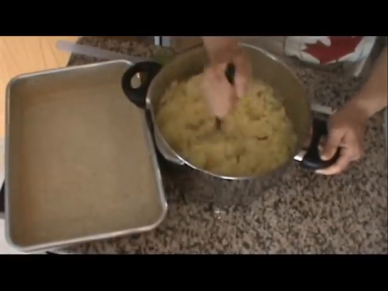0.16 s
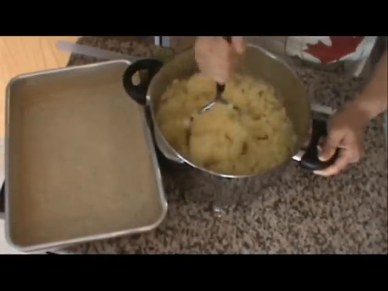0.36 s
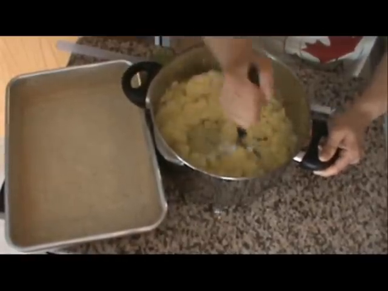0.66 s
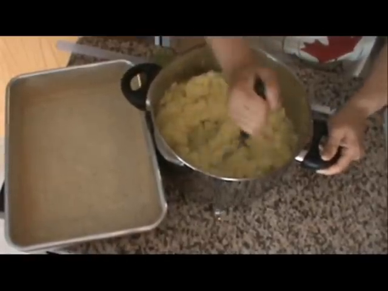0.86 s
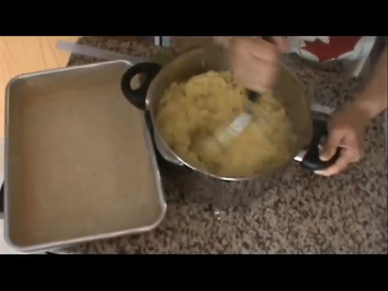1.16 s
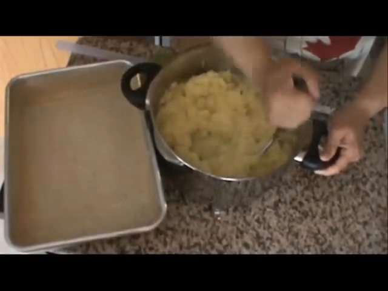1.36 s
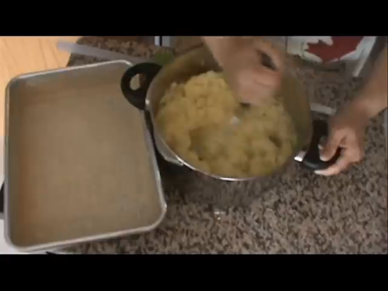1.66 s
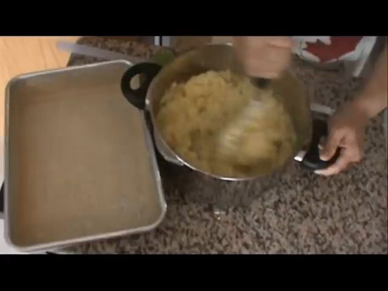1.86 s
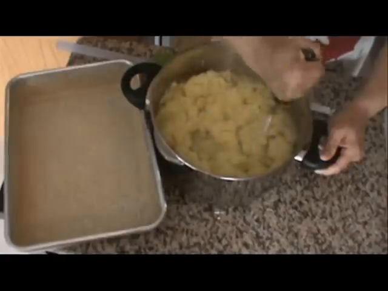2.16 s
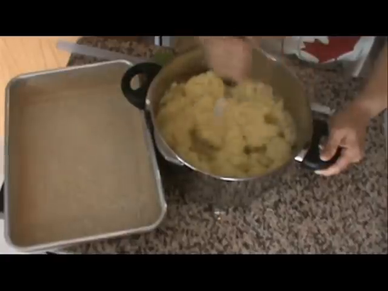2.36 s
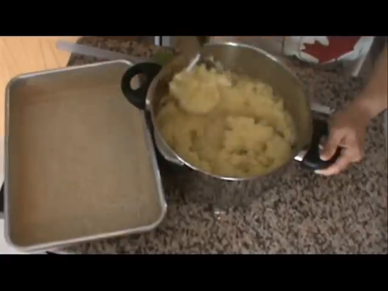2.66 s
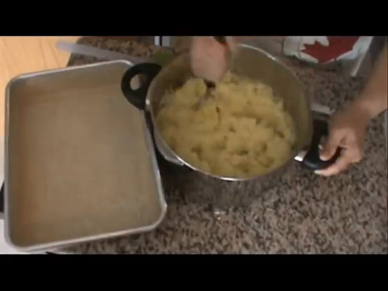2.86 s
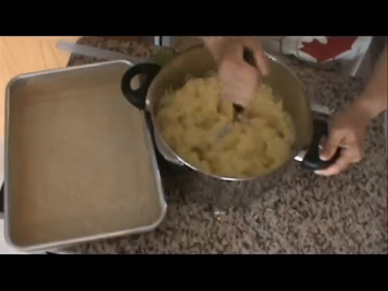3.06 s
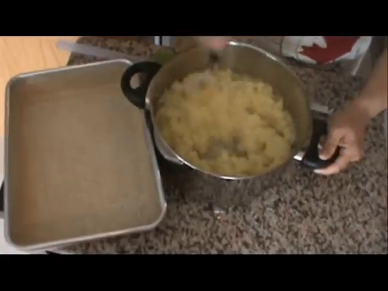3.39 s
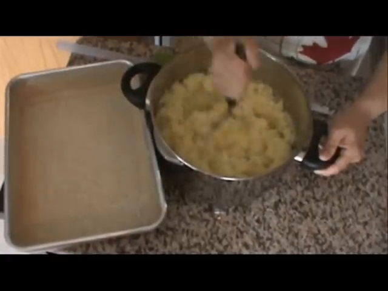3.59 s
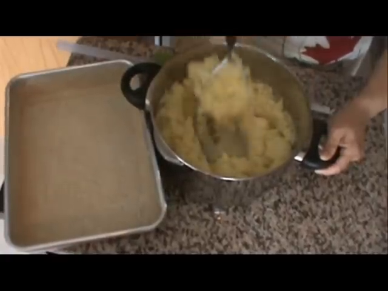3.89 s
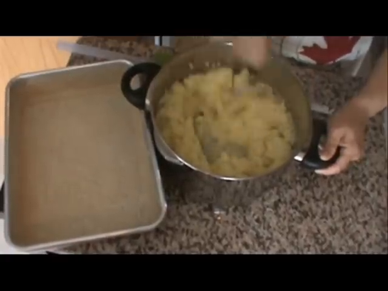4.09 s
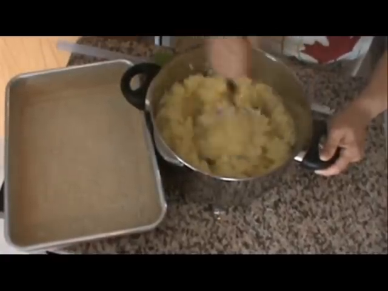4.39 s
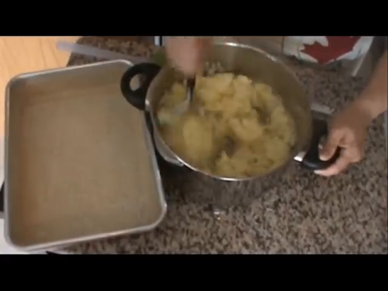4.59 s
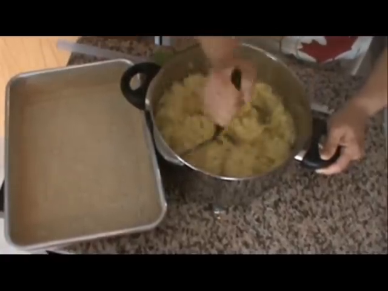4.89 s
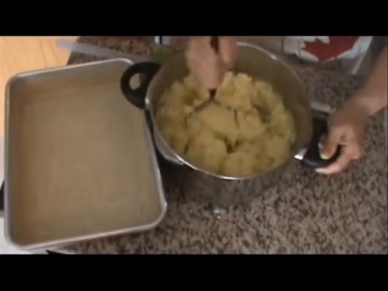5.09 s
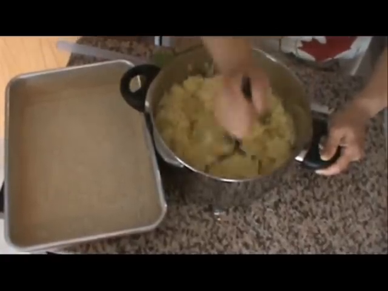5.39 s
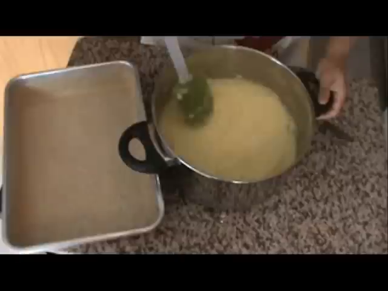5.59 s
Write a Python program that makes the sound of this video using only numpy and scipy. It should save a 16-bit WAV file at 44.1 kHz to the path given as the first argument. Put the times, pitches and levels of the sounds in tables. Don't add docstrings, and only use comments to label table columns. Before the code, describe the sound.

Potatoes are mashed by hand in a steel pot on a stone counter. Irregular strokes each give one or more hard, briefly ringing clanks, gritty metal scraping and mushy squish, followed by tiny sticky ticks as the masher peels free. Some strokes add a brief rough squeal or airy plop. The sound is close, narrow stereo, with little room echo, low background noise, crunchy peaks and an abrupt end.

```python
import sys
import numpy as np
from scipy import signal
from scipy.fft import rfft, irfft, next_fast_len
from scipy.io import wavfile
from scipy.ndimage import uniform_filter1d

SR = 44100
rng = np.random.default_rng(int(sys.argv[2]) if len(sys.argv) > 2 else 0)


def decibels_to_gain(level_db):
    exponent = np.asarray(level_db, float) / 20
    return 10 ** exponent


def generate_wav(signal):
    frames = np.transpose(np.atleast_2d(signal))
    scaled = np.clip(frames, -1, 1) * 32767
    pcm = np.round(scaled).astype(np.int16)
    wavfile.write(sys.argv[1], SR, pcm)


N = 253303

# start in seconds, peak in dB, struck tone in Hz, treble in dB re peak, thud in dB.
KNOCKS = [(0.139, 3, 1840, -1, -12.5), (0.166, 4.5, 1290, -6.5, -22.5), (0.748, -2, 1070, 6, -48),
          (0.793, -6, 900, -9, -18), (0.836, -0.5, 1800, -0.5, -13), (1.368, 6, 1320, -2.5, -37),
          (1.5205, 3, 940, -36, -7.5), (2.0366, -8, 2230, 12, -35), (2.063, -4, 2300, 9.5, -19),
          (2.6956, 0.5, 3200, 1, -16), (2.85, -12, 1450, -16, -20.5), (2.901, 2.5, 1930, -6.5, -13.5),
          (3.377, -1, 2830, 3.5, -34), (3.405, 1, 2940, -20, -11.5), (3.608, 7, 1220, -5, -13),
          (4.222, 2, 1070, -5.5, -19), (4.738, -14, 3580, 6.5, -18), (4.966, 7, 1070, -3, -9.5),
          (5.396, -3.5, 3590, 7.5, -21), (5.547, -8, 1150, -8, -30), (5.571, 0.5, 1950, 1, -10.5),
          (5.59, 2, 2140, -11, -12), (2.268, -30, 900, -10, -21), (4.734, -17, 1900, -2, -26)]
# pitch in Hz, level in dB, t60 in seconds.
POT = [(232, -5, 0.51), (280, -31, 0.071), (620.5, -0.5, 0.22), (887, 3.5, 0.079), (1070, 5, 0.14),
       (1125, 4, 0.078), (1492, 2.5, 0.099), (1730, 8.5, 0.1), (1930, 9.5, 0.042), (2230, 11.5, 0.049),
       (3020, -1.5, 0.1), (3226, -3, 0.24), (3490, 0.5, 0.12), (3670, 0.5, 0.2), (4450, -10, 0.037),
       (4650, 9, 0.034), (5080, 14, 0.025), (5730, 12.5, 0.03), (6300, -1.5, 0.052), (7400, -20.5, .05)]
HIT_ATTACK_S, SOFT_ATTACK_S, LIFT_ATTACK_S = 0.0014, 0.0054, 0.03


def rms_one(x):
    return x / np.sqrt(np.mean(x ** 2) + 1e-20)


def at_hz(points, hz):
    points_hz, values = np.transpose(points)
    return np.interp(np.log(hz + 1e-9), np.log(points_hz), values)


def shaped(x, points, turn=0.):
    # frequency in Hz, lead of the left in radians.
    port_lead = [(20, 0), (130, .2), (260, .4), (950, .5), (1290, 0.1), (2240, 0.2), (6460, 0), (15200, 0)]
    size = next_fast_len(N)
    hz = np.arange(size // 2 + 1) * SR / size
    response = decibels_to_gain(at_hz(points, hz)) * np.exp(1j * turn * at_hz(port_lead, hz))
    return irfft(rfft(x, size) * response, size)[:N]


def band(x, low_hz, high_hz):
    edges_hz = [low_hz, min(high_hz, 0.45 * SR)]
    return signal.sosfilt(signal.butter(2, edges_hz, "band", fs=SR, output="sos"), x)


def drift(rate):
    r = np.exp(-80 * np.pi * rate / SR)
    slow = signal.lfilter([1], [1, -2 * r, r * r], rng.standard_normal(N // 40 + 2002))[2000:]
    return np.interp(np.arange(N) / 40, np.arange(len(slow)), rms_one(slow))


def ring(clicks, hz, t60):
    r = decibels_to_gain(-60 / (max(t60, 0.001) * SR))
    w = 2 * np.pi * hz / SR
    return signal.lfilter([0, np.sin(w)], [1, -2 * r * np.cos(w), r * r], clicks + 1e-18)


def grains(per_s, spread_db):
    sizes = decibels_to_gain(spread_db * np.minimum(rng.exponential(1, N), 5)) * rng.choice([-1, 1], N)
    return rms_one(sizes * (rng.random(N) < per_s / SR))


def nearness(hz, centre_hz, octaves):
    return np.exp(-0.5 * (np.log2(hz / centre_hz) / octaves) ** 2)


def add(out, s, piece):
    i = round(s * SR)
    out[i:i + len(piece)] += piece[:N - i]


def on_samples(curve):
    return np.interp(np.arange(N) / SR * 1000, np.arange(len(curve)), curve)


def contact(s, hold, first_db, last_db, attack_s, stop_db_per_s, settle_db=-99):
    columns = (s, np.maximum(hold, 0.002), first_db, last_db)
    s, hold, first_db, last_db = [np.reshape(v, (-1, 1)) for v in columns]
    t = np.arange(0, N / SR + 0.002, 0.001) - s
    after = np.maximum(t - hold, 0)
    level = decibels_to_gain(first_db + (last_db - first_db) * np.clip(t / hold, 0, 1))
    release = decibels_to_gain(-stop_db_per_s * after) ** 2
    slump = decibels_to_gain(settle_db - 62.5 * after) ** 2
    return (level * np.clip(1 + t / attack_s, 0, 1)) ** 2 * (release + slump)


def strokes():
    # start in seconds, length in seconds, scrape in dB,
    # sizzle in dB at first, sizzle in dB at the end.
    slides = [(0.0, 0.13, -19.5, -31.5, -16), (0.7495, 0.083, -17.5, -13.5, -21.5),
              (1.369, .1, -16, -21.5, -21), (1.472, .047, -20, -16, -10), (2.038, 0.091, -15, -17, -16.5),
              (2.704, 0.069, -20, -30, -20.5), (2.795, 0.16, -28.5, -29.5, -32),
              (3.378, 0.034, -18, -33, -32), (3.48, 0.11, -26, -32, -26), (4.148, 0.036, -24, -19, -27),
              (4.739, 0.15, -21, -32, -19.5), (5.409, 0.105, -18.5, -22, -22)]
    # start in seconds, length in seconds,
    # crackle in dB, sizzle in dB.
    lifts = [
        (0.297, 0.21, -46, -40),
        (0.966, .22, -40, -35.5),
        (1.657, 0.15, -35.5, -36),
        (2.222, 0.33, -44, -38),
        (3.116, 0.084, -41, -35.5),
        (3.722, 0.1, -43, -37),
        (4.079, .09, -37.5, -37),
        (4.342, 0.14, -34.5, -34.5),
        (5.006, 0.31, -55, -42.5),
    ]
    # start in seconds, hold in seconds, mash in dB,
    # cavity tone in Hz, grit on steel in dB re mash.
    presses = [(0.0, 0.006, -19, 1300, -2.5), (.14, 0.015, -15.5, 1430, -7), (.166, .03, -16.5, 1300, -9),
               (.7495, 0.004, -22, 1190, -5), (.836, 0.018, -22, 1560, -3), (1.369, 0.04, -20.5, 1220, 0),
               (1.521, 0.0047, -13.5, 970, -20.5), (2.038, 0.026, -19, 990, 6),
               (2.697, 0.0059, -18, 1590, -3), (2.902, 0.057, -22.5, 2050, -26),
               (3.378, 0.043, -14, 1173, 1.5), (3.61, 0.05, -20, 1700, -19),
               (4.147, 0.056, -28.5, 1170, -13), (4.223, 0.04, -27, 1000, -4.5),
               (4.737, 0.0099, -23, 1040, 3.5), (4.968, 0.02, -15.5, 2050, -6.5),
               (5.396, 0.0079, -16.5, 1110, -16), (5.571, 0.053, -16, 1500, -12)]
    pulls = [(.255, 0.025, -24.5, 1730, 0), (.8, 0.03, -23, 800, -29), (.98, 0.025, -23.5, 1730, -9),
             (1.46, 0.074, -25, 1110, -8), (2.16, 0.074, -25, 1570, -4), (2.62, 0.013, -42, 1230, 7),
             (2.985, 0.03, -20, 1610, -10.5), (3.04, 0.015, -23.5, 1500, -13.5),
             (3.72, 0.071, -36.5, 1340, 3.5), (4.27, 0.074, -26, 1080, -7.5),
             (4.335, 0.043, -21, 1600, -8.5), (4.41, .04, -32.5, 1570, -6), (2.39, 0.014, -31, 1120, -9),
             (4.63, 0.054, -36.5, 940, -2.5), (4.83, 0.1, -30, 1520, -12.5),
             (5.03, 0.052, -22.5, 2000, -2.5), (5.125, 0.0099, -22, 930, -12.5),
             (5.22, 0.055, -49.5, 920, -11.5), (5.34, 0.014, -39, 880, 6),
             (5.547, 0.016, -18.5, 1187, -15.5)]
    settle_db, mash_stop, grit_stop, sizzle_stop, lift_stop = -11, 208, 200, 247.5, 121.5

    s, length, db, first, last = np.transpose(slides)
    grit = contact(s, length, db, db - 0.5, HIT_ATTACK_S, 171.5).sum(0)
    sizzle = contact(s, length, first, last, HIT_ATTACK_S, sizzle_stop).sum(0)

    s, length, db, top = np.transpose(lifts)
    grit += contact(s, length, db, db, LIFT_ATTACK_S, lift_stop).sum(0)
    sizzle += contact(s, length, top, top, LIFT_ATTACK_S, lift_stop).sum(0)

    squeeze, pitch = 1e-8, 1e-5
    for rows, attack_s in ((presses, HIT_ATTACK_S), (pulls, SOFT_ATTACK_S)):
        s, hold, db, hz, grit_db = np.transpose(rows)
        s = s + attack_s - HIT_ATTACK_S
        push = contact(s, hold, db, db, attack_s, mash_stop, settle_db)
        squeeze = squeeze + push.sum(0)
        pitch = pitch + hz @ push
        steel = db + grit_db
        grit += contact(s, hold, steel, steel, attack_s, grit_stop, settle_db).sum(0)
        top = steel - 3
        sizzle += contact(s, hold, top, top, attack_s, sizzle_stop).sum(0)

    scrape_db, sizzle_db, mash_db = 10 * np.log10(np.array([grit, sizzle, squeeze]) + 1e-8)
    tone_hz = 3600 * 2 ** np.clip(sizzle_db - scrape_db, -0.6, 0.6)
    return [on_samples(c) for c in (scrape_db, tone_hz, sizzle_db, mash_db, pitch / squeeze)]


def scrape(scrape_db, tone_hz, sizzle_db):
    # frequency in Hz, density in dB per Hz.
    sizzle_colour = [(880, -59.5), (1500, 16), (2620, 4.5), (3650, 7), (3950, 12), (5780, -10.5),
                     (11300, -10.5), (14200, -16), (15500, -19.5)]
    grit = grains(per_s=9000, spread_db=2.0)
    wander = [decibels_to_gain(2.5 * drift(12)) for k in range(4)]
    tones = 0
    for k, (hz, db, t60) in enumerate(POT[9:]):
        touch = 1.3 + 0.57 * nearness(hz, tone_hz, 0.2)
        tones = tones + ring(grit * decibels_to_gain(db) * wander[k % 4] * touch, hz, 0.15 * t60)
    broad = shaped(grit, sizzle_colour)
    body = decibels_to_gain(-3.5) * rms_one(tones) + decibels_to_gain(-3.5) * rms_one(band(broad, 2220, 6300))
    top = decibels_to_gain(sizzle_db - 2.5) * rms_one(band(broad, 8540, 24400))
    roughness = decibels_to_gain(1.6 * drift(18) + 0.6 * drift(140))
    return roughness * (decibels_to_gain(scrape_db) * body + top)


def mash(mash_db, cavity_hz):
    grit = grains(per_s=4000, spread_db=3.0)
    dealt = rng.integers(0, 14, N)
    cavities, walls = 0, 0
    for k, hz in enumerate(np.geomspace(520, 2500, 14)):
        opening = grit * (dealt == k) * (0.5 + 6.2 * nearness(hz, cavity_hz, 0.71))
        cavities = cavities + ring(opening, hz, 18.0 / hz)
    for hz, db, t60 in POT[2:10]:
        touch = 0.49 + 1.6 * nearness(hz, cavity_hz, 0.066)
        walls = walls + ring(grit * decibels_to_gain(db) * touch, hz, 0.33 * t60)
    return decibels_to_gain(mash_db + 2.1 * drift(22)) * (decibels_to_gain(-5.5) * rms_one(cavities) + decibels_to_gain(-8.0) * rms_one(walls))


def singing():
    # start in seconds, length in seconds, level in dB, pitch in Hz, t60 in seconds.
    sung = [(0.0, .015, -23, 1250, .015), (.266, .02, -24, 1700, .012), (.268, .025, -26, 1150, .012),
            (.295, .012, -27, 1750, .015), (0.852, .008, -19, 1600, .015), (.813, .02, -25, 700, .008),
            (2.1, .1, -26, 2270, .025), (3.43, .07, -27, 3100, .012), (3.415, .03, -19, 1120, .03),
            (4.305, .015, -26, 1080, .02), (5.035, .02, -27, 1100, .015), (4.968, .08, -29.5, 1045, .05),
            (2.056, .035, -13, 2240, .05), (2.08, .055, -19, 3560, .04), (2.05, .065, -26, 595, .035),
            (2.07, .04, -23, 1125, .04), (3.39, .055, -23, 600, .035), (5.403, 0.05, -25, 3660, .03),
            (.836, .004, -14, 1850, .014), (2.038, 0.008, -11, 2232, .04), (2.038, 0.01, -13, 3400, .04),
            (2.699, .045, -25, 1080, .04), (2.71, 0.07, -25, 3410, .015), (2.903, .005, -19, 2000, .02),
            (3.38, 0.056, -20, 3190, .012)]
    s, length, db, hz, t60 = np.transpose(sung)
    power = contact(s, length, db + 1.5, db - 2.0, 0.00055, 2000)
    grit = grains(per_s=3000, spread_db=3.5)
    out = np.zeros(N)
    for p, f, ring_s in zip(power, hz, t60):
        drive = grit * np.sqrt(on_samples(p) * 2 * np.log(1000) / (ring_s * SR))
        out += ring(drive, f, ring_s) + 0.57 * ring(drive, f * 1.026, ring_s)
    return out


def counter(mash_db):
    # pitch in Hz, level in dB, t60 in seconds.
    slab_modes = [(184, -18.5, 0.41), (217, 9, 0.2), (255, 2, 0.3), (291.2, -10, 0.5), (399.4, -5, 0.26)]
    # start in seconds, swell in dB, pitch in Hz.
    sways = [
        (0.16, -37.5, 37.7),
        (0.859, -22, 44.3),
        (1.541, -21.5, 48.3),
        (2.078, -33.5, 65),
        (2.299, -27.5, 55.6),
        (2.929, -23.5, 43.7),
        (3.63, -32, 61.9),
        (4.249, -28, 48.4),
        (4.988, -32, 40.7),
        (5.576, -27.5, 37.7),
    ]
    kicks, t = np.zeros(N), np.arange(SR // 4) / SR
    for s, db, hz, treble_db, thud_db in KNOCKS:
        add(kicks, s + 0.00383, decibels_to_gain(thud_db - 11.0) * np.ones(1))
    rub = rng.standard_normal(N)
    shift = decibels_to_gain(-42 + 2.0 * drift(1.2)) + decibels_to_gain(mash_db - 25.5)
    thuds = sum(decibels_to_gain(db) * ring(kicks, hz, t60) for hz, db, t60 in slab_modes)
    rubbed = sum(decibels_to_gain(db) * ring(rub, hz, 0.24 * t60) for hz, db, t60 in slab_modes)
    out = band(thuds, 170, 2000) + shift * rms_one(rubbed)
    for s, db, hz in sways:
        add(out, s, decibels_to_gain(db + 13.5) * np.sin(2 * np.pi * hz * t) * (t / 0.053) * np.exp(-t / 0.023))
    return out


def room_noise():
    # frequency in Hz, density in dB per Hz.
    hiss_colour = [(12, -45), (20, 13), (47, -4.5), (185, -7), (245, -5), (333, -1.5), (491, -0.5),
                   (549, -4), (767, -7), (1980, -17.5), (11100, -24), (13100, -26), (15500, -22)]
    # pitch in Hz, level in dB rms.
    hum_lines = [(59, -41.5), (119, -45.5)]
    t, hum = np.arange(N) / SR, 0
    for hz, db in hum_lines:
        level = decibels_to_gain(db - 1 + 3.8 * drift(5.4))
        hum = hum + level * np.sin(2 * np.pi * hz * t + 0.28 * drift(0.94))
    return decibels_to_gain(-38) * rms_one(shaped(rng.standard_normal(N), hiss_colour)) + hum


def squeals():
    # start in seconds, length in seconds, level in dB, from Hz, to Hz.
    glides = [
        (.085, .033, -20.5, 6020, 7800),
        (1.415, .055, -24, 5500, 5900),
        (1.475, .043, -24, 6200, 7000),
        (1.48, .04, -22, 10500, 12000),
        (2.106, 0.022, -15, 6100, 6400),
        (2.717, .072, -26, 3600, 7750),
        (4.333, 0.057, -36.5, 4520, 7800),
        (4.827, 0.053, -26, 4580, 6770),
        (5.449, 0.06, -20.5, 4600, 7600),
    ]
    out, t = np.zeros(N), np.arange(SR // 8) / SR
    low_pass = signal.butter(2, 900, fs=SR, output="sos")
    rough = signal.sosfilt(low_pass, rng.standard_normal((len(glides), 2, len(t))))
    for (s, length, db, from_hz, to_hz), (a, b) in zip(glides, rms_one(rough)):
        way = np.clip(t / length, 0, 1)
        phase = 2 * np.pi * np.cumsum(from_hz * (to_hz / from_hz) ** way) / SR
        swell = way ** 0.6 * np.exp(-np.maximum(t - length, 0) / 0.0054)
        add(out, s, decibels_to_gain(db) * swell * (a * np.sin(phase) + b * np.cos(phase)))
    return out


def smacks():
    # start in seconds, peak in dB, centre in Hz, length in seconds.
    peels = [(0.099, -11, 8140, 0.014), (1.048, -16, 5500, 0.01), (1.166, -31, 5640, 0.0097),
             (1.723, -21.5, 5000, 0.014), (1.884, -34.5, 5780, 0.011), (2.113, -9, 3670, 0.01),
             (2.373, -25.5, 3700, 0.0097), (2.516, -31, 5200, 0.0085), (2.599, -29.5, 3270, 0.0091),
             (2.651, -14, 3460, 0.0029), (3.226, -22, 2500, 0.0049), (4.11, -31, 5000, 0.044),
             (4.145, -18, 8700, 0.008), (4.175, -19, 5200, 0.011), (4.522, -33.5, 5410, 0.0094),
             (4.643, -21, 4500, 0.014), (4.869, -12, 6000, 0.016), (5.139, -8, 4700, 0.015),
             (5.131, -12, 2300, .028), (5.345, -22, 2800, .008), (4.116, -24, 3500, .02),
             (4.147, -17, 4300, .012), (2.631, -13, 1100, .005), (3.251, -30, 3900, .006)]
    out, grit, t = np.zeros(N), grains(per_s=6500, spread_db=4.0), np.arange(SR // 12) / SR
    for s, db, hz, length in peels:
        swell = (1 - np.exp(-t / 0.0016)) * np.exp(-t / max(length, 0.002))
        burst = grit[round(s * SR):][:len(t)] * swell
        add(out, s - 0.001, decibels_to_gain(db + 1.0) * band(burst, hz / 1.67, hz * 1.41))
    return out


def knocks():
    rows, out, t = np.array(KNOCKS), np.zeros(N), np.arange(SR // 20) / SR
    luck = rng.normal(0, 1, (len(rows), len(POT)))
    snap = rng.standard_normal((len(rows), len(t)))
    at = np.round(rows[:, 0] * SR).astype(int)
    for k, (hz, db, t60) in enumerate(POT):
        held = np.zeros(N)
        bright = rows[:, 3] * np.clip(np.log2(hz / 1500), 0, 1)
        touch = 0.58 + 1.98 * nearness(hz, rows[:, 2], 0.21)
        held[at] = decibels_to_gain(rows[:, 1] + db - 20 + bright + 1.2 * luck[:, k]) * touch * (-1) ** k
        out += ring(held * 0.16, hz, t60) + ring(held, hz * 1.02, 0.14 * t60)
    for (s, db, hz, treble_db, thud_db), noise in zip(rows, snap):
        add(out, s, decibels_to_gain(db + treble_db - 6.5) * band(noise * np.exp(-t / 0.0028), 3000, 11000))
        add(out, s, decibels_to_gain(db - 1.5) * band(noise * np.exp(-t / 0.0079), hz / 1.83, hz * 1.77))
    return out


def pops():
    # start in seconds, peak in dB, pitch in Hz, sputter length in seconds. The rows at 0.794, 0.838,
    # 2.902 and 5.548 s are short blobs from the pot at a knock.
    pockets = [(0.273, -23, 1610, 0.007), (0.983, -21, 1900, 0.0067), (1.494, -26, 660, 0.0086),
               (2.25, -18, 750, 0.0019), (2.254, -21, 1710, 0.0019), (2.631, -22, 2690, 0.0019),
               (2.62, -27, 1900, 0.002), (2.65, -30, 2200, 0.0024), (3.162, -23, 800, 0.002),
               (4.195, -13, 1220, 0.004), (4.953, -18, 880, 0.0023), (4.489, -13, 792, 0.0027),
               (4.55, -15.5, 1070, 0.0072), (4.556, -16.5, 770, 0.007), (5.129, -12, 805, 0.012),
               (5.138, -5.5, 905, .008), (5.146, -4, 880, 0.005), (5.152, -6, 1000, 0.006),
               (5.159, -6, 900, .003), (5.168, -10, 880, .004), (5.344, -27, 912, .003),
               (.838, -8, 1850, .002), (.794, -15, 880, .003), (5.548, -17, 1100, .004),
               (2.902, -8, 1900, .004), (5.223, -22.5, 920, 0.0086), (5.27, -19, 795, 0.0074),
               (5.282, -21, 950, 0.006), (5.352, -14.5, 790, 0.013), (5.358, -12.5, 955, 0.006),
               (4.479, -27, 900, 0.0028), (2.227, -21, 1500, 0.0022), (5.132, -9.5, 960, 0.0037),
               (4.174, -22, 1300, .002)]
    out, t = np.zeros(N), np.arange(SR // 100) / SR
    luck = rng.random((len(pockets), 6, 3))
    spray = rng.standard_normal((len(pockets), len(t)))
    for (s, db, hz, length), puffs, noise in zip(pockets, luck, spray):
        spatter = decibels_to_gain(-11) * band(noise * np.exp(-t / 0.003), 1400, 5200)
        for k, (when, tune, size) in enumerate(puffs):
            later = k > 0
            pitch = hz * (1 + (0.86 * tune - 0.25) * later)
            swell = t * pitch / 0.9
            puff = np.sin(2 * np.pi * pitch * t) * swell * np.exp(1 - swell) + spatter
            start = s - 0.001 + length * (k + when - 1) / 2.3 * later
            add(out, start, decibels_to_gain(db + 5 - later * (8 + 8 * size)) * puff)
    return band(out, 560, 9000)


def ticks():
    # start in seconds, peak in dB, centre in Hz.
    strands = [(0.3764, -23, 5780), (0.3954, -24, 4590), (0.4174, -24, 11000), (0.4569, -25, 5450),
               (0.4993, -28, 8460), (0.5636, -25, 7390), (0.5945, -26, 10900), (0.6384, -18.5, 9910),
               (2.6005, -21, 9000), (0.6779, -25, 10500), (0.7183, -28, 7320), (1.1388, -24, 9390),
               (1.1677, -21, 10400), (1.1832, -20, 5450), (1.2156, -28, 11400), (1.6791, -22, 4590),
               (1.719, -19.5, 5110), (1.726, -14, 5500), (1.7314, -21, 4650), (1.7724, -15, 10100),
               (1.7814, -24.5, 5280), (1.365, -17, 2500), (1.8272, -16, 10900), (1.8414, -23, 10500),
               (1.8871, -23, 5780), (2.2264, -19, 4770), (2.5167, -12, 10000), (2.6309, -18, 4660),
               (2.8184, -21, 5040), (3.1233, -23, 6690), (3.1532, -23, 10200), (3.1794, -26, 9560),
               (3.2064, -22, 10170), (2.6455, -8, 3400), (3.5684, -17, 5150), (3.7294, -24, 6210),
               (3.7554, -20, 4650), (3.7734, -21, 9300), (3.8297, -20, 4700), (3.8714, -20, 9810),
               (4.0507, -18, 9230), (4.0716, -22, 8900), (4.0964, -25, 10300), (4.1056, -15, 9530),
               (4.117, -16, 10600), (4.146, -9, 8750), (4.1624, -10, 5170), (4.1744, -14, 4830),
               (4.1789, -14, 5700), (4.1944, -8, 4960), (4.2178, -7, 5040), (4.2752, -23, 6580),
               (4.2994, -23, 6790), (4.5201, -21, 5410), (5.0429, -12, 5880), (5.1314, -9, 4660),
               (5.3238, -25, 4830), (5.3472, -20, 4840)]
    out, t = np.zeros(N), np.arange(SR // 50) / SR
    decay = np.exp(-t / 0.0012) + 0.12 * np.exp(-t / 0.006)
    for (s, db, hz), noise in zip(strands, rng.standard_normal((len(strands), len(t)))):
        snap = band(noise * decay, hz / 1.7, hz * 1.7)
        add(out, s, decibels_to_gain(db - 3) * snap / np.abs(snap).max())
    return out


def kitchen(x):
    t60_s, wall_cut_hz = 0.59, 15800
    size = next_fast_len(N + SR // 2)
    hz = np.arange(size // 2 + 1) * SR / size
    tails = np.zeros((2, len(hz)), complex)
    for k, lag in enumerate(rng.uniform(0.008, 0.035, 12)):
        loop = decibels_to_gain(-60 * lag / t60_s) / (1 + 1j * hz / wall_cut_hz) * np.exp(-2j * np.pi * hz * lag)
        tails[k % 2] += (-1) ** (k // 2) * loop / (1 - loop)
    return irfft(rfft(x, size) * tails, size)[:, :N]


def scene():
    # frequency in Hz, side re mid in dB.
    side_colour = [(60, -14), (110, -12), (200, -10), (380, -9), (700, -6), (1290, -5), (2380, -8),
                   (4400, -13), (8120, -12), (11500, -12), (12500, -26)]
    # frequency in Hz, left re right in dB.
    balance = [(60, -1), (110, -4.5), (200, 5), (380, 0.5), (700, 1), (1290, -0.5), (2380, 0.5),
               (4400, -0.5), (8120, 0.5), (15000, -2)]
    scrape_db, tone_hz, sizzle_db, mash_db, cavity_hz = strokes()
    slab, struck, burst = counter(mash_db), knocks(), pops()
    pot = scrape(scrape_db, tone_hz, sizzle_db) + mash(mash_db, cavity_hz) + slab + struck + burst
    pot = pot + smacks() + singing() + ticks() + squeals()
    echo, other_echo = kitchen(pot)
    mid = pot + decibels_to_gain(-26) * echo + room_noise()
    late = decibels_to_gain(-3) * np.roll(pot, 90) + decibels_to_gain(-17) * other_echo + room_noise()
    side = decibels_to_gain(0.5) * shaped(late, side_colour)
    side = side + decibels_to_gain(-7) * band(np.roll(slab, 45), 90, 500)
    side = side + decibels_to_gain(-6) * np.roll(burst, 12)
    left, right = [[(hz, sign * db / 2) for hz, db in balance] for sign in (1, -1)]
    return np.array([shaped(mid + side, left, 0.3), shaped(mid - side, right, -0.3)])


def patchy(side):
    # from seconds, to seconds.
    narrowed = [(0, .13), (.18, .31), (.5, .65), (.97, 1.06), (1.39, 1.49), (2.28, 2.37), (2.55, 2.62),
                (2.72, 2.77), (2.92, 3.02), (3.28, 3.35), (3.48, 3.72), (4.08, 4.2), (4.6, 4.7),
                (5.02, 5.08), (5.3, 5.38)]
    hz, s, cells = signal.stft(side, SR, nperseg=1024)
    row, column = (hz // 400).astype(int), (s // 0.07).astype(int)
    patches = rng.random((row.max() + 1, column.max() + 1)) < 0.5
    kept = patches[row][:, column] * (sum((s > a) * (s < b) for a, b in narrowed) == 0)
    return signal.istft(cells * np.where(hz[:, None] > 4000, kept * 1.3, 1), SR)[1][:N]


def band_limit(x):
    return signal.sosfilt(signal.butter(12, 15650, fs=SR, output="sos"), x)


def record(dry):
    # from seconds, to seconds.
    dull_spells = [(.2, .33), (.9, 1.05), (2.17, 2.3), (2.9, 3.12), (3.4, 3.73), (4.55, 4.63), (5.2, 5.26)]
    # time in seconds, level in dB.
    ending = [(5.612, 0), (5.616, -20), (5.634, -24), (5.638, -80)]
    t = np.arange(N) / SR
    dry = signal.sosfilt(signal.cheby2(10, 50, 15500, fs=SR, output="sos"), dry)
    hard = np.clip(dry / (1 + np.abs(dry / 1.15) ** 8) ** (1 / 8), -1, 1)
    dullness = uniform_filter1d(sum((t > a) * (t < b) for a, b in dull_spells) * 1., 512)
    dull = signal.sosfiltfilt(signal.cheby2(8, 30, 13700, fs=SR, output="sos"), hard)
    hard = hard + dullness * (dull - hard)
    hard = hard.mean(0) + patchy(hard[0] - hard[1]) / 2 * [[1], [-1]]
    return band_limit(hard * decibels_to_gain(np.interp(t, *np.transpose(ending))))


dry = scene()
out = record(dry)
generate_wav(out)
```